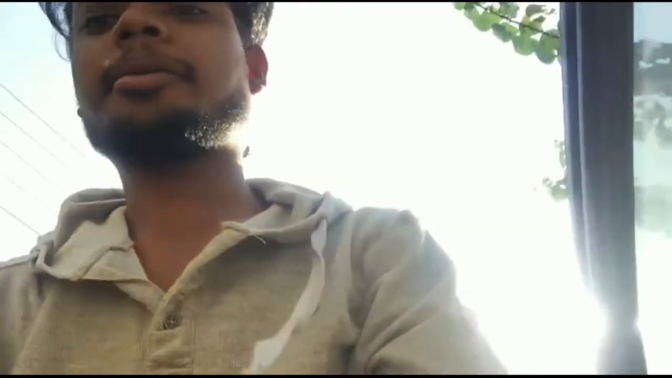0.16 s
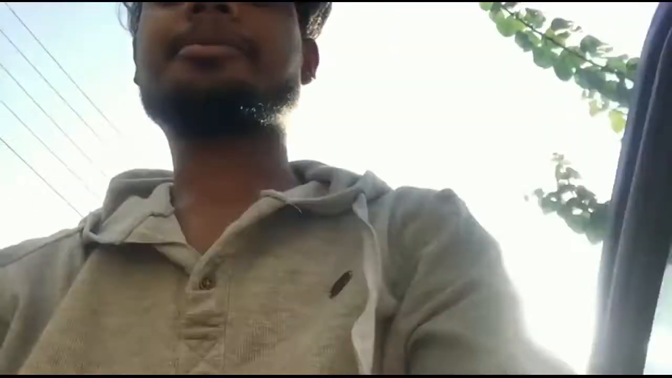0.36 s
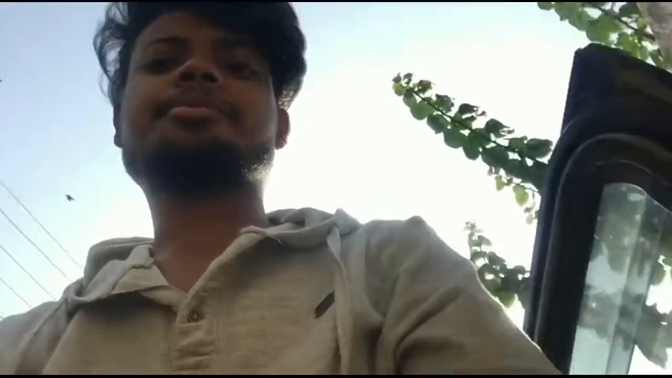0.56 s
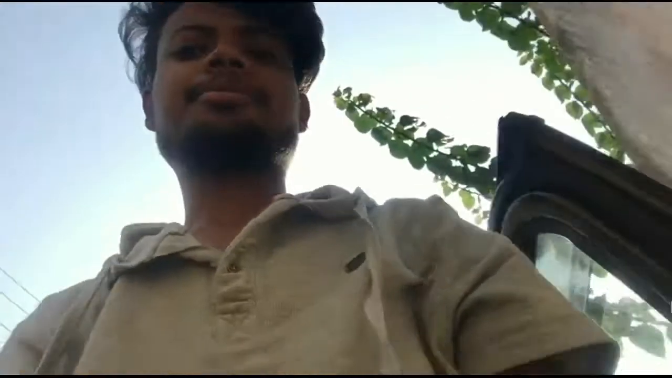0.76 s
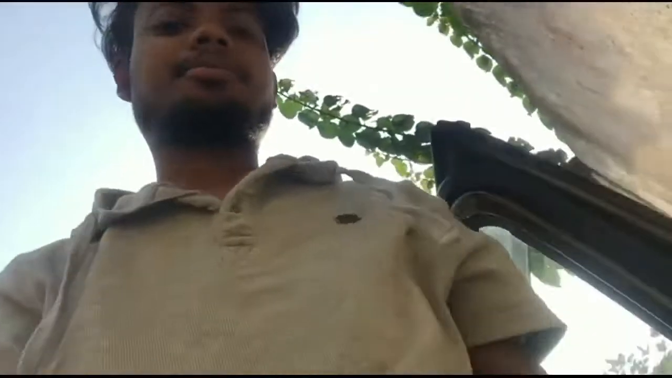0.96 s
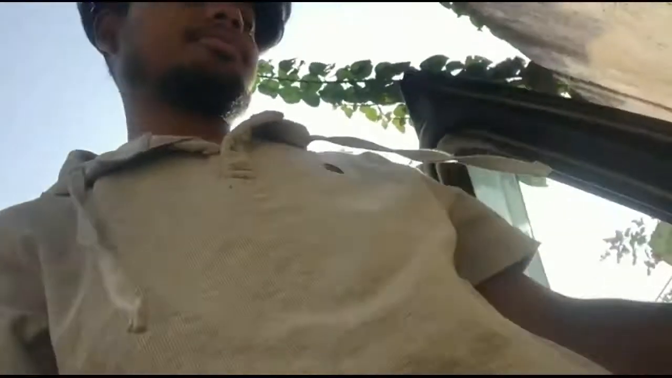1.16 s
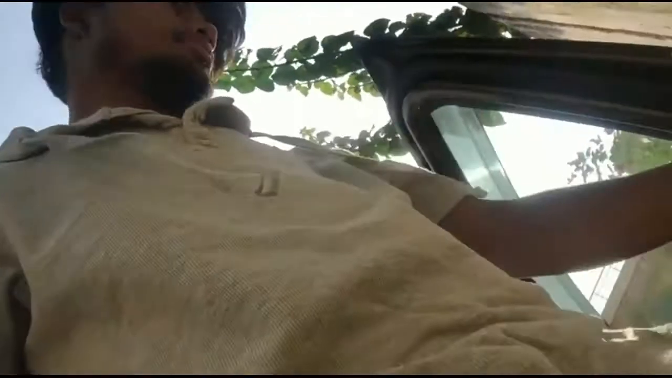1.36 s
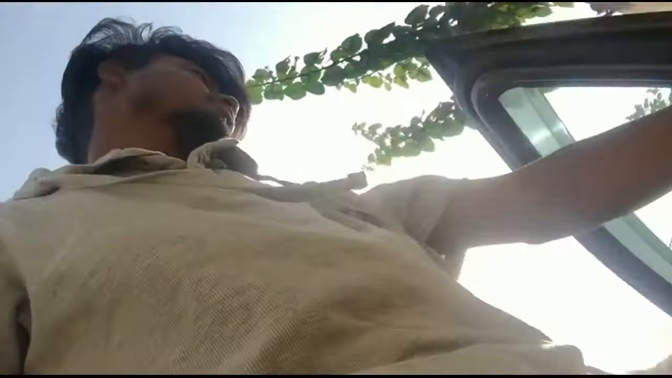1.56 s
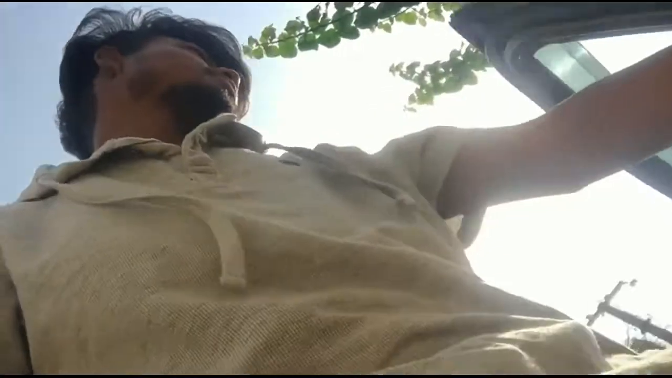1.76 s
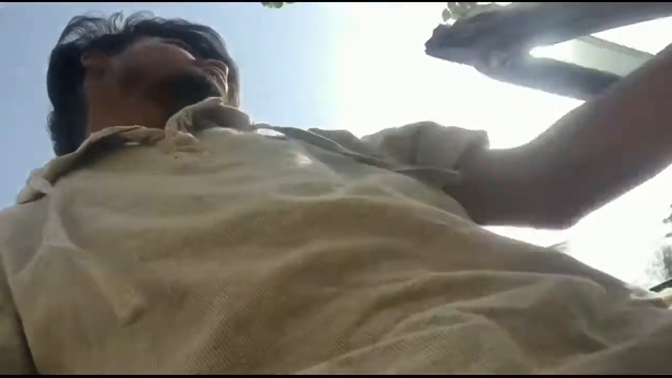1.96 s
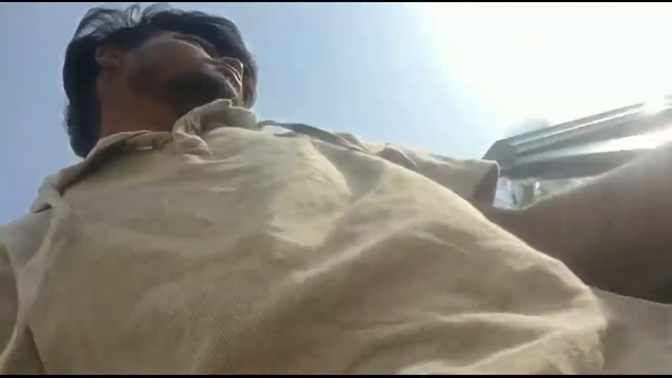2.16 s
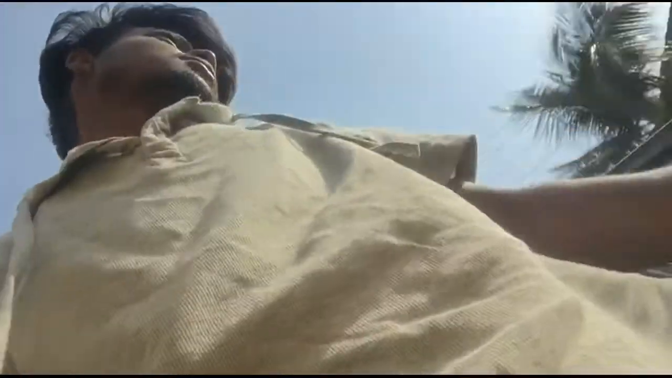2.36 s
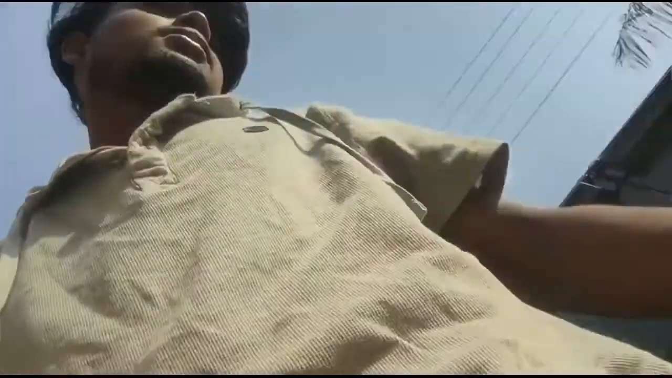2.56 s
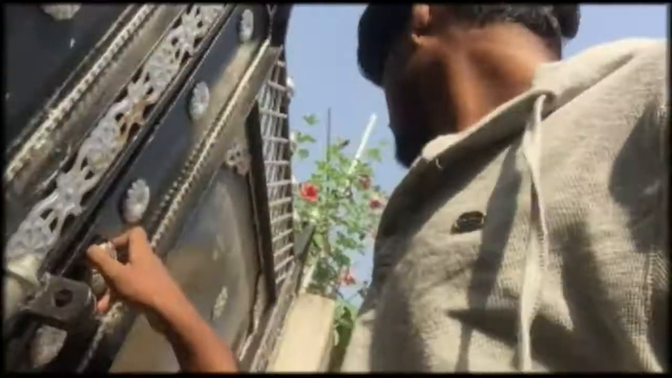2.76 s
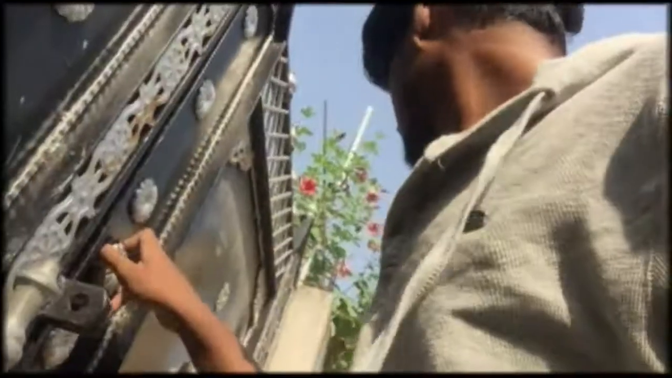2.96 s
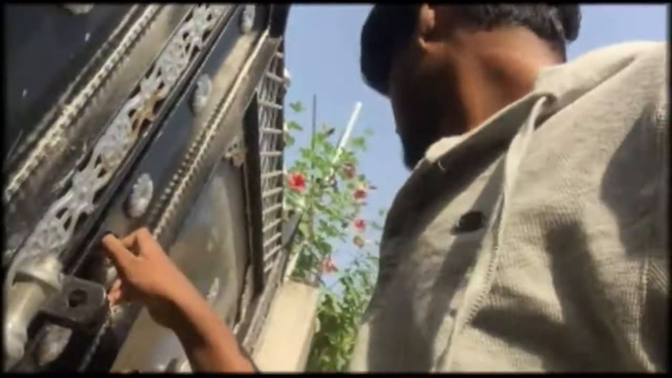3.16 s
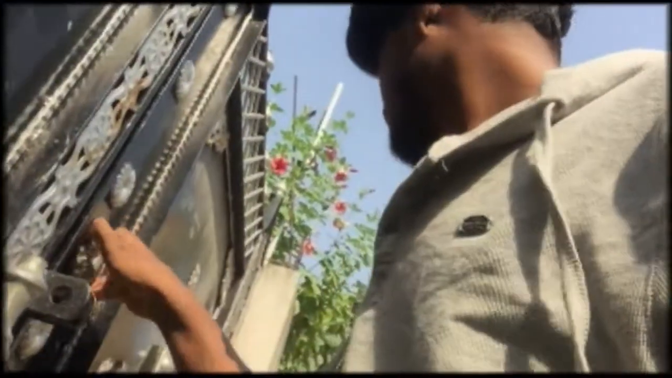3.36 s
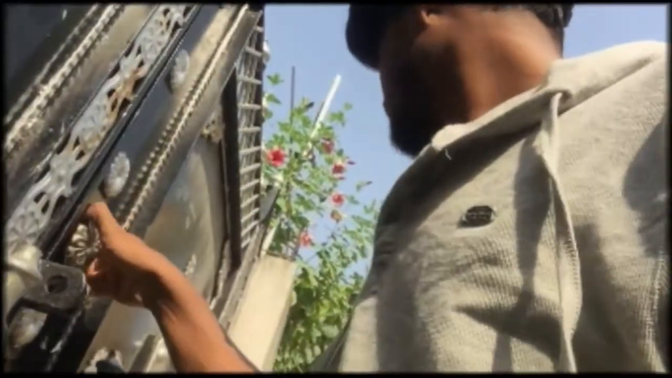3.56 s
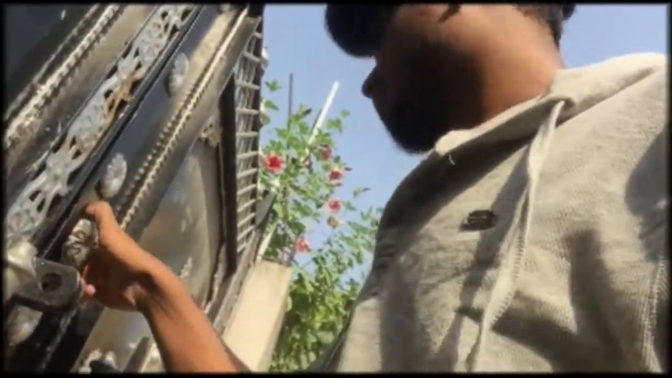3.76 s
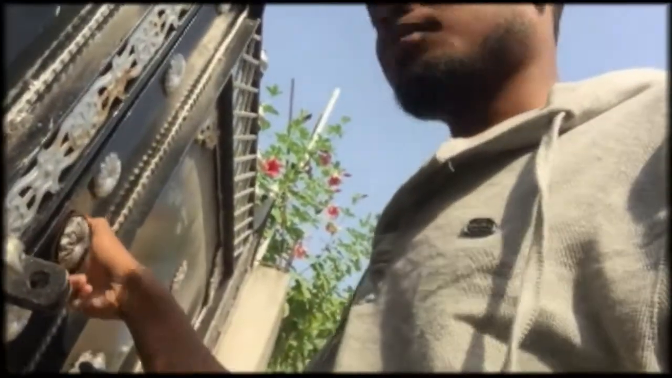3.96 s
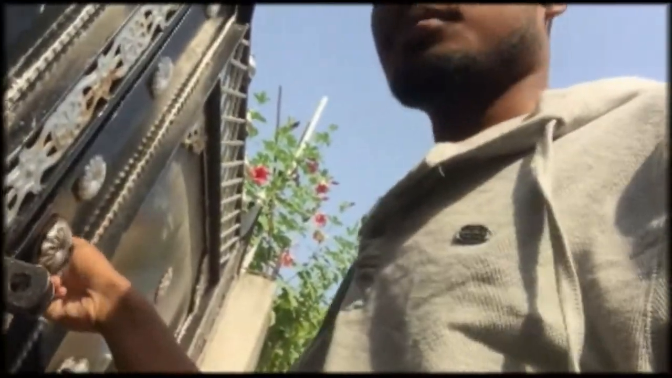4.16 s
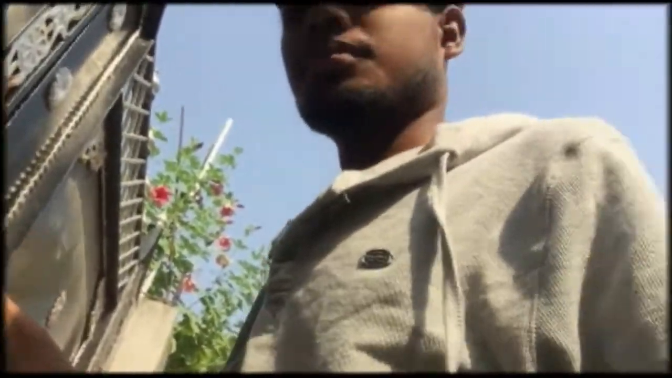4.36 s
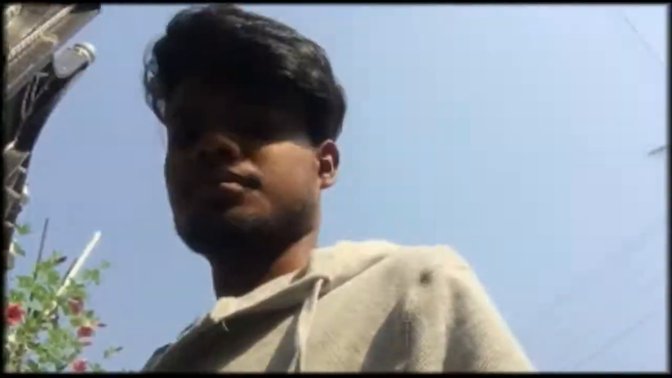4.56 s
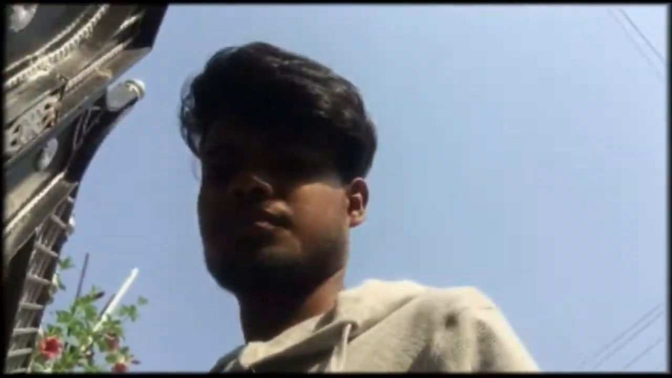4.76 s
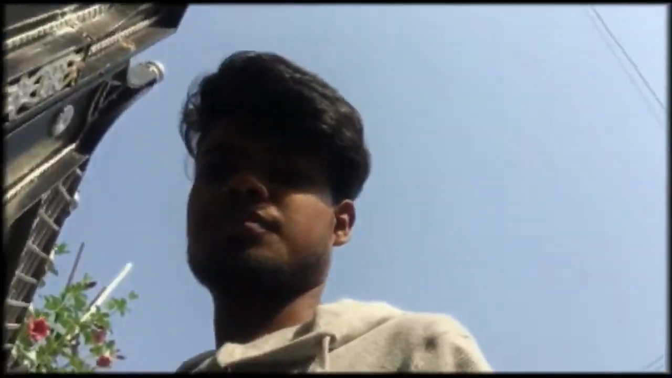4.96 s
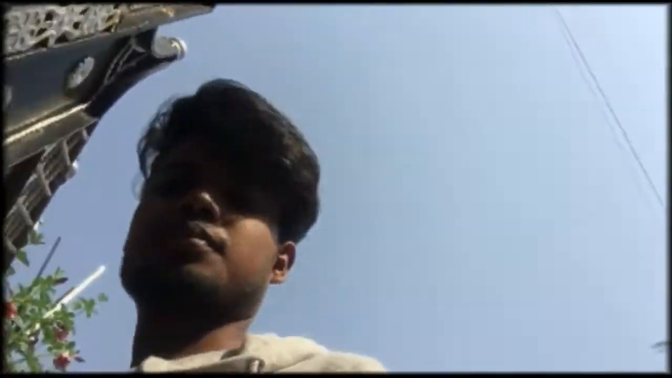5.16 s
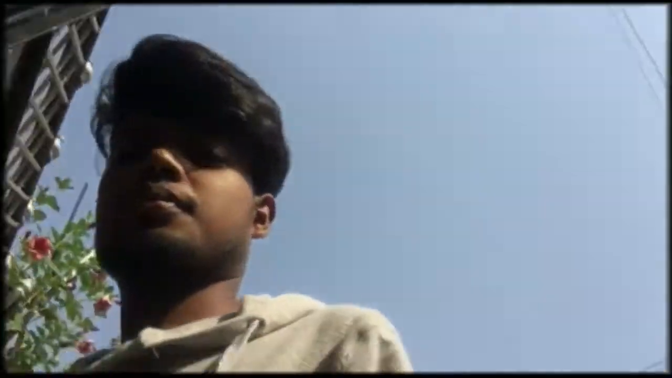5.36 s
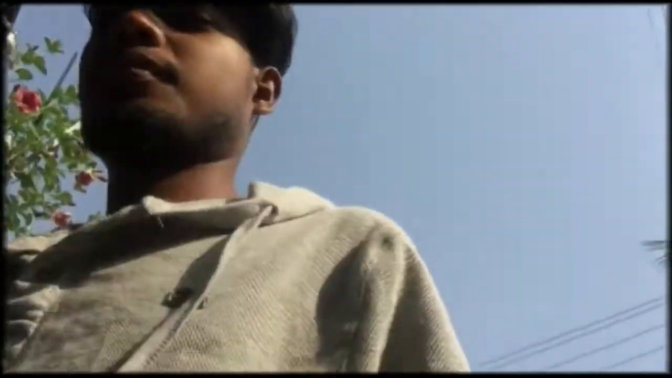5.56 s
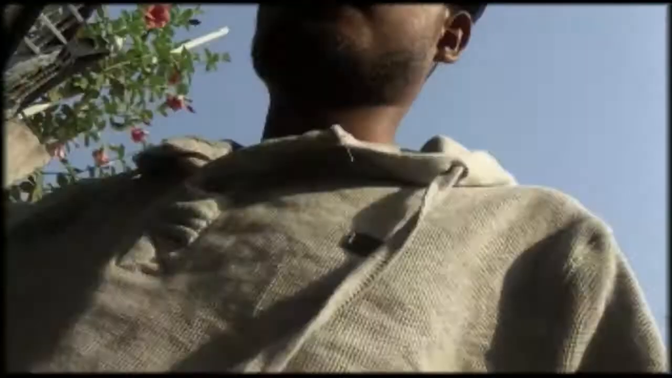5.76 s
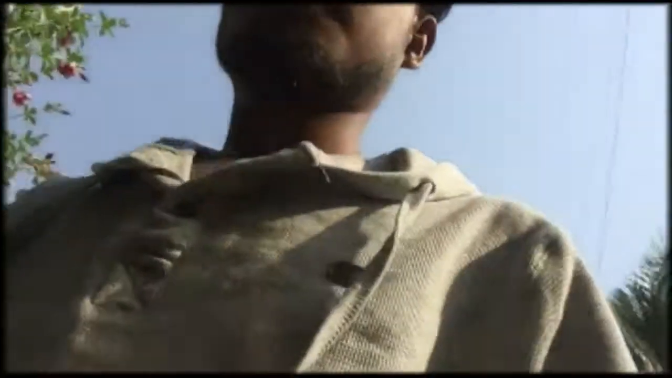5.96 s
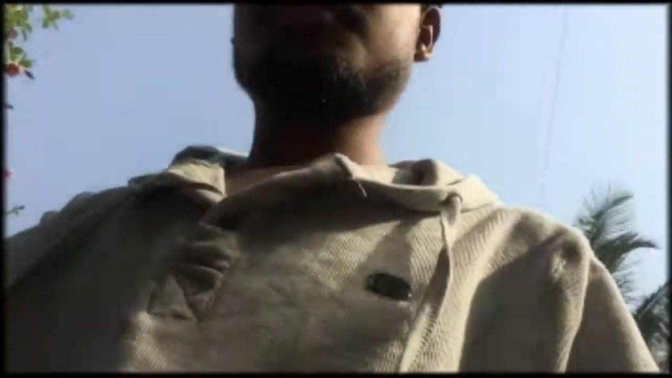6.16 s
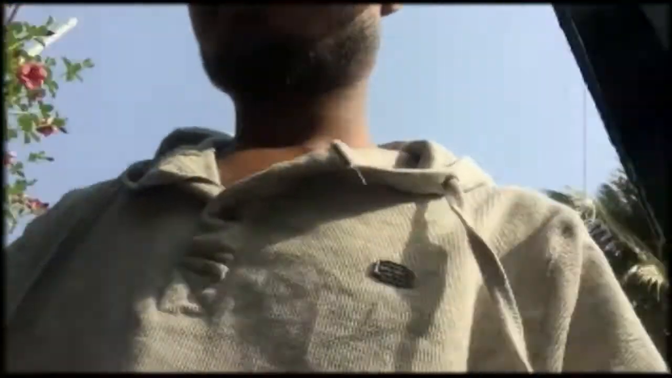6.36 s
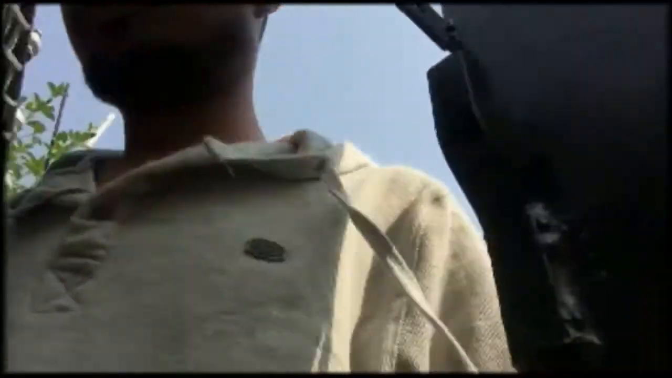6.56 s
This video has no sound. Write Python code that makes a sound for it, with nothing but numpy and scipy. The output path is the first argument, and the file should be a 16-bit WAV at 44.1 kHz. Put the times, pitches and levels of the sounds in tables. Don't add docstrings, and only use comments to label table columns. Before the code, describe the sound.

Bright songbird trills over scuffing soles in a walled yard, a steel gate slams hard, then a bolt grinds and a latch clanks over engine drone.

```python
import sys
import numpy as np
from scipy import signal
from scipy.io import wavfile
from scipy.ndimage import uniform_filter1d

SR = 44100
rng = np.random.default_rng(int(sys.argv[2]) if len(sys.argv) > 2 else 0)


def boost(x):
    u = np.asarray(x, float) / 20
    return 10 ** u


def file_out(sig):
    cols = np.atleast_2d(sig).T
    lim = np.clip(cols, -1, 1)
    pcm = np.round(lim * 32767).astype(np.int16)
    wavfile.write(sys.argv[1], SR, pcm)


N = 295470
TIME = np.arange(N) / SR
CUT_S = 2.617
EDGES = 20 * 2 ** np.arange(0, 9.8, 1 / 3)

# after_start_ms, pitch_hz, level_db
DIP = [(0, 5300, -24), (5, 4650, -11), (11, 4150, 2), (15, 3550, -9), (19, 3400, -19), (25, 4100, 3),
       (29, 4600, -9), (33, 5700, -22)]
SWEEP = [(0, 5900, -12), (5, 7300, -18), (9, 6900, -18), (12, 5950, -8), (16, 5050, -12), (20, 4400, 3),
         (24, 4200, 5), (27, 3500, -5), (33, 2600, -14)]
WARBLE = [(0, 4300, -4), (3.5, 5800, -8), (7, 5850, -5), (10, 4900, -14), (14, 4500, 3), (18, 4250, -2),
          (24, 3500, 0), (29, 3480, 2), (37, 4300, -3)]
CHIP = [(0, 6200, -18), (4, 5600, -14), (6, 4500, 0), (7.5, 4050, 7), (10, 3900, -8), (13, 4200, -4),
        (15, 4300, -20)]
LIFT = [(0, 2900, -8), (3, 2850, -3), (6, 3050, 1), (9, 3350, 1), (12, 3500, -12)]
DROP = [(0, 5000, -14), (2, 3600, -4), (4, 2950, 0), (9, 2900, -4), (13, 3000, 2), (19, 3050, -6),
        (22, 3100, -18)]
# mode_hz, level_db, t60_s
FRAME = [(174.2, -0.5, 0.26), (308, -0.5, 0.25), (400, -1.5, 0.18), (547, -6.5, .08), (647, 0, 0.074),
         (820, -5, 0.052), (944, -11.5, 0.052), (1462, -11.5, 0.17), (2080, -9, 0.024)]
# band_hz, level_db_per_hz
LOCK_TAIL = [(290, -16.5), (960, -21), (2980, -4.5), (5020, -17), (6800, -14.5), (14000, -32), (16000, -55)]
# band_hz, t60_s
GRIT_T60 = [(300, 0.13), (2000, 0.027), (12000, 0.014)]
BAR_T60 = [(200, 0.097), (1000, 0.22), (4000, 0.13), (12000, 0.074)]


def rms_one(x):
    return x / np.sqrt(np.mean(x ** 2) + 1e-20)


def in_time(rows):
    s, *columns = np.transpose(rows)
    return [np.interp(TIME, s, c) for c in columns]


def at_hz(points, hz):
    points = np.array(points)
    return np.interp(np.log(hz), np.log(points[:, 0]), points[:, 1])


def filtered(x, order, hz, kind):
    return signal.sosfilt(signal.butter(order, hz, kind, fs=SR, output="sos"), x)


def drift(rate):
    knots_per_s = 400
    knots = rng.standard_normal(7 * knots_per_s)
    r = np.exp(-2 * np.pi * min(rate, 150) / knots_per_s)
    smooth = rms_one(signal.lfilter([1], [1, -2 * r, r * r], knots))
    return np.interp(TIME * knots_per_s, np.arange(len(knots)), smooth)


def breath(hz):
    return rms_one(filtered(rng.standard_normal(N), 4, hz, "low"))


def ring(x, hz, t60):
    r, w = boost(-60 / (t60 * SR)), 2 * np.pi * hz / SR
    return signal.lfilter([0, np.sin(w)], [1, -2 * r * np.cos(w), r * r], x + 1e-18)


def dying(x, t60):
    return signal.lfilter([1], [1, -boost(-60 / (t60 * SR))], x + 1e-18)


def clicks(events, spread_db=0):
    out, rows = np.zeros(N), np.array(events)
    level_db = rows[:, 1] + spread_db * rng.standard_normal(len(rows))
    out[np.round(rows[:, 0] * SR).astype(int)] = boost(level_db)
    return out


def softened(x, samples):
    return signal.lfilter(np.hanning(samples) / (samples / 2), [1], x)


def coloured(spectrum, gain, source=None, span=slice(None)):
    white = rng.standard_normal((2, N)) if source is None else source
    centre = np.sqrt(EDGES[1:] * EDGES[:-1])
    level = boost(at_hz(spectrum, centre)) * (centre > spectrum[0][0]) * (centre < spectrum[-1][0])
    level = level / np.sqrt(np.sum(level ** 2 * np.diff(EDGES)) * 2 / SR)
    out = np.zeros(N)
    for k in np.flatnonzero(level):
        band = filtered(white[k % 2, span], 2, EDGES[k:k + 2], "band")
        out[span] += level[k] * gain(centre[k]) * band
    return out


def blows(events, modes, modes_db, tail, tail_t60, tail_db):
    span = slice(max(int(events[0][0] * SR) - SR // 4, 0), int(events[-1][0] * SR) + SR)
    hit = clicks(events)[span]
    rattle = coloured(tail, lambda hz: boost(tail_db) * dying(hit, at_hz(tail_t60, hz)), span=span)
    ringing = sum(boost(db) * ring(clicks(events, spread_db=5), hz, t60) for hz, db, t60 in modes)
    return rattle + boost(modes_db) * ringing


def effort(strokes, motion):
    s, hold, *levels = np.array(strokes).T[:, :, None]
    rise, fall, steeper = motion
    loss_db = rise * np.clip(s - TIME, 0, None) + fall * np.clip(TIME - s - hold, 0, None)
    body_db = np.max(levels[0] - loss_db, axis=0)
    grit_db = np.max(levels[1] - steeper * loss_db, axis=0)
    return uniform_filter1d(boost(np.clip([body_db, grit_db], -120, 0)), size=300, axis=1)


def rubbing(gains, body, treble, body_db, treble_db, grain_db):
    busy = np.flatnonzero(gains[0] > boost(-100))
    span = slice(busy[0], busy[-1])
    level, top = gains[:, span]
    grains = rng.standard_normal((2, N)) * boost(grain_db * drift(150))
    grains /= grains.std()
    low = coloured(body, lambda hz: level * boost(body_db + 2.5 * drift(23)[span]), grains, span)
    high = coloured(treble, lambda hz: top * boost(treble_db + 3.7 * drift(40)[span]), grains, span)
    return low + high


def whistle(out, s, hz, db, flutter, overtones_db, wobble):
    # pitch_hz, level_db
    beak = [(2500, 5), (3750, 1), (4250, 3.5), (4750, -1), (6000, 7), (9000, 10), (12000, 18.5), (15500, 5)]
    span = slice(int(s[0] * SR), min(int(s[-1] * SR), N))
    t = TIME[span]
    pitch, level_db = np.interp(t, s, hz) * (1 + wobble[span]), np.interp(t, s, db)
    phase = 2 * np.pi * np.cumsum(pitch) / SR
    edge = np.clip(np.minimum(t - s[0], s[-1] - t) / .002, 0, 1)
    richer_db = .5 * (level_db + 27) - 20 * np.log2(pitch / 3800)
    partials = 0
    for k, overtone_db in enumerate(overtones_db):
        partial_db = overtone_db + k * richer_db + at_hz(beak, (k + 1) * pitch)
        partials = partials + boost(partial_db) * np.sin((k + 1) * phase)
    voice = np.zeros(N)
    voice[span] = np.sqrt(2) * edge * flutter[span] * boost(level_db) * partials
    return out + voice


def bird():
    # syllable, start_s, repeats, gap_s, gap_growth, level_db
    trills = [
        (DIP, .019, 3, .0345, 1.03, -23),
        (DIP[:5], .123, 1, 0, 1.0, -21),
        (DROP, .293, 1, 0, 1.0, -28),
        (CHIP, .331, 3, .0145, 1.0, -26),
        (LIFT, .382, 3, .015, 1.0, -27),
        (SWEEP, .4895, 1, 0, 1.0, -28),
        (SWEEP, .5405, 3, .054, 1.04, -24),
        (SWEEP, .7145, 1, 0, 1.0, -27),
        (WARBLE, 1.049, 6, .037, 1.0, -27),
    ]
    # after_start_ms, pitch_hz, level_db
    falling_chip = [(0, 6200, -6), (2, 5500, 0), (5, 4300, -2), (7, 3800, -10)]
    grace_s = (.866, .8725, .879)
    # start_s, length_s, first_hz, last_hz, level_db
    held = [(0.317, 0.0086, 6730, 6300, -37.5), (0.371, 0.012, 6400, 6540, -39),
            (0.275, .04, 8300, 9000, -58), (0.883, 0.022, 4370, 4235, -25),
            (0.905, 0.005, 4400, 6300, -34.5), (0.915, 0.022, 5940, 6150, -41),
            (0.909, .016, 2930, 3180, -33), (0.922, 0.118, 3170, 3400, -32),
            (1.369, 0.089, 2745, 2940, -47), (1.465, .03, 3836, 3875, -35.5),
            (1.503, 0.072, 4600, 4640, -44), (1.492, 0.063, 2800, 2800, -45),
            (1.673, 0.025, 4200, 4290, -30.5), (1.715, 0.1, 3640, 3560, -36.5), (1.70, .1, 4270, 4230, -47),
            (.85, .03, 2540, 2600, -50), (2.255, .04, 12900, 12900, -66), (1.717, 0.054, 3140, 3160, -46),
            (1.716, 0.062, 7500, 7100, -54), (2.165, 0.038, 3870, 3840, -39.5),
            (2.25, 0.033, 4320, 4230, -35), (2.287, 0.025, 3800, 3700, -34.5),
            (2.316, 0.039, 3550, 3520, -32.5), (2.365, 0.029, 3595, 3580, -33.5),
            (2.59, 0.026, 5680, 5870, -50)]
    # start_s, length_s, first_hz, last_hz, level_db
    rattles = [(0.266, 0.07, 5480, 5600, -44), (.33, 0.073, 5680, 6600, -41.5),
               (1.38, .04, 3300, 3270, -41.5), (1.435, 0.065, 3600, 4200, -37.5),
               (1.41, 0.14, 5620, 5560, -45), (1.43, 0.085, 6400, 6400, -56),
               (1.498, 0.069, 3200, 3270, -37), (1.28, .09, 3900, 3860, -45),
               (1.6, 0.072, 3300, 3650, -39.5), (1.635, 0.09, 5600, 5700, -43),
               (1.65, .12, 6800, 5900, -53.5), (2.2, 0.065, 2530, 3900, -41.5),
               (2.22, 0.077, 6200, 6600, -47.5), (2.225, .035, 4300, 5070, -38.5),
               (.91, 0.07, 6000, 6050, -45), (.33, .05, 11500, 11500, -62), (1.6, 0.057, 10000, 13000, -69),
               (.02, .14, 5600, 6000, -54), (1.735, .06, 3620, 3600, -40), (1.74, .035, 6200, 6250, -48),
               (.03, .13, 7200, 7200, -56), (.33, .09, 7400, 7000, -56), (1.55, .09, 5600, 5700, -54),
               (.93, .05, 9300, 9300, -60), (1.07, .2, 4600, 4500, -44)]
    # time_s, pitch_hz, level_db
    falling = [
        (1.861, 6030, -42),
        (1.904, 5950, -32.5),
        (1.937, 5480, -30.5),
        (1.970, 4950, -33),
        (1.999, 4406, -25),
        (2.031, 4100, -24),
        (2.09, 3880, -25),
        (2.128, 3850, -30),
        (2.15, 3850, -42),
    ]
    catches_s = (2.046, 2.070)
    overtones_db = [-1.5, -30, -46]

    out, even, shake = np.zeros(N), boost(1.2 * drift(130)), drift(160)
    sung = [(falling_chip, s, 1, -33) for s in grace_s]
    for shape, first, count, gap, slowing, db in trills:
        for k in range(count):
            start = first + gap * np.sum(slowing ** np.arange(k))
            sag = 1 - .008 * (k - (count - 1) / 2)
            ends_db = -2.5 * (2 * k / max(count - 1, 1) - 1) ** 2
            sung.append((shape, start, sag, db + ends_db))
    for shape, start, stretch, level_db in sung:
        ms, hz, db = np.transpose(shape)
        s = start + ms / 1000
        wobble = 0.008 * shake * (np.interp(TIME, s, hz) / 4000) ** 2
        out = whistle(out, s, stretch * hz, db + level_db, even, overtones_db, wobble)

    pulsing = np.sin(2 * np.pi * np.cumsum(70 * boost(1.4 * drift(20.0))) / SR) + 2.0 * drift(120)
    for start, length, first_hz, last_hz, level_db in held:
        buzz = np.clip((level_db + 32) / (-38 + 32), 0, 1)
        flutter = even * (1 + (0.11 + 0.13 * buzz) * pulsing)
        out = whistle(out, np.array([start, start + length]), [first_hz, last_hz],
                      np.full(2, level_db), flutter, overtones_db, (.005 + .012 * buzz ** 2) * shake)

    flicks_per_s, flick_span, rattle_shake = 70, .04, .03
    cycle = np.cumsum(flicks_per_s * boost(1.5 * drift(25.5))) / SR
    for row, (start, length, first_hz, last_hz, level_db) in enumerate(rattles):
        flick = (cycle + .37 * row) % 1
        flutter = (0.5 + breath(300)) * np.sin(np.pi * flick) ** 2
        wobble = flick_span * (2 * flick - 1) + rattle_shake * shake
        out = whistle(out, np.array([start, start + length]), [first_hz, last_hz],
                      np.full(2, level_db + 1.5), flutter, overtones_db, wobble)

    out = out * (1 + boost(-12) * breath(350))
    s, hz, db = np.transpose(falling)
    broken = 1 - sum(np.exp(-((TIME - c) / 0.01) ** 2) for c in catches_s)
    flutter = broken * boost(2.5 * drift(110) - 2) * (1 + .35 * breath(300))
    return whistle(out, s, hz, db, flutter, overtones_db, 0.009 * shake)


def gate_slam():
    # start_s, peak_db
    touch = [
        (2.3865, -8),
        (2.390, -16),
        (2.395, -5.5),
    ]
    # start_s, peak_db
    impacts = [
        (2.4005, -12.5),
        (2.4035, 5),
        (2.4065, -4),
        (2.410, -3.5),
        (2.421, -5),
        (2.470, -11),
    ]
    # start_s, peak_db
    boom = [
        (2.4055, 11.5),
        (2.4195, 5.5),
        (2.434, -4),
        (2.4455, 4),
    ]
    # mode_hz, level_db, t60_s
    bars = [(400, 6, 0.037), (511, 4.5, 0.08), (770, -3, 0.044), (940, -14, 0.048), (1210, -10, 0.06),
            (1490, -16, 0.059), (2054, -2, 0.029), (2520, -3, 0.078)]
    leaf = [(52.4, -6, 0.45), (69.7, -3, 0.32), (90, -12, 0.49), (139.6, -16.5, 0.26), (196.8, -12, 0.21)]
    # band_hz, t60_s
    rattle = [(59, -10), (100, -7.5), (239, -15.5), (930, -11), (1080, -13), (16000, -48.5)]
    rattle_t60 = [(100, 0.61), (500, 0.086), (2000, 0.11), (10000, 0.11)]
    out = blows(impacts, bars, -15.5, rattle, rattle_t60, -14.0)
    push = softened(clicks(boom), 90)
    out += sum(boost(db - 11.5) * ring(push, hz, t60) for hz, db, t60 in leaf)
    contact = softened(clicks(touch), 40)
    return out + sum(ring(contact, hz, t60) for hz, _, t60 in bars[:2])


def feet():
    # start_s, hold_s, level_db, grit_db
    scuffs = [(.08, 0.072, -35.5, -70), (.2, 0.47, -47, -78), (.65, 0.0074, -36.5, -56),
              (.69, 0.0048, -33.5, -70), (.72, 0.087, -42.5, -85), (1.41, 0.01, -40, -66.5),
              (1.5, 0.0078, -37, -85), (1.61, 0.0019, -39.5, -70), (1.83, .003, -33.5, -70),
              (1.94, 0.0031, -37, -83.5), (2.0, 0.04, -45, -84.5), (2.374, 0.032, -29, -69)]
    # rise_db_per_s, fall_db_per_s, grit_steepness
    motion = (780, 190, 0.6)
    # band_hz, level_db_per_hz
    sole = [(200, -8), (430, -9), (600, -8), (1000, -5), (2400, -11.5)]
    # start_s, peak_db
    grains = [(0.4, -17.5), (0.616, -17), (0.646, -18), (0.685, -16.5), (0.717, -10.5), (0.734, -10.5),
              (1.412, -19.5), (1.496, -29.5), (1.588, -24.5), (1.818, -23), (1.827, -24.5), (1.933, -23),
              (1.983, -36), (2.005, -33.5)]
    scrape = [(2400, 0.0), (5000, -2.5), (10000, -12.0), (16500, -19.5)]
    crunch = [(300, 8.5), (1000, -5.5), (3000, -13.0), (16500, -34.0)]
    out = rubbing(effort(scuffs, motion), sole, scrape, 0.27, 18.7, 3.9)
    return out + blows(grains, [(623, 0.0026, 0.064)], -12.0, crunch, GRIT_T60, -14.5)


def key():
    # start_s, peak_db
    clinks = [
        (2.8795, -24.5),
        (2.883, -22),
        (2.8935, -28.5),
        (2.897, -24),
        (2.903, -38),
    ]
    # start_s, peak_db
    turn = [
        (3.430, -27),
        (3.439, -27.5),
        (3.459, -21),
    ]
    # start_s, hold_s, level_db, grit_db
    twists = [
        (3.12, 0.066, -48, -67.5),
        (3.385, 0.053, -41.5, -57.5),
        (3.45, 0.0016, -27, -34.5),
        (3.6, 0.12, -53, -85),
    ]
    # rise_db_per_s, fall_db_per_s, grit_steepness
    motion = (600, 270, 1.8)
    # band_hz, level_db_per_hz
    cylinder = [(300, 1), (600, -28), (960, 11.5), (1400, -4), (3000, -7.5), (4200, -37), (5000, -32)]
    # mode_hz, level_db, t60_s
    modes = [(1098, -10, 0.1), (1922, -12, .1), (2153, -13, 0.14), (2616, -8, 0.06), (2955, -14, .07),
             (3908, -18, .08), (5421, -18, .05), (6751, -1, 0.045), (6950, -8, 0.06)]
    # band_hz, t60_s
    rattle_t60 = [(500, 0.97), (3000, 0.063), (12000, 0.024)]
    scrape = [(5000, -9.0), (6800, 2.0), (8000, 13.0), (9500, -11.0), (16500, -15)]
    out = rubbing(effort(twists, motion), cylinder, scrape, 0.57, .6, 3.6)
    out += blows(clinks, modes, -3.0, LOCK_TAIL, rattle_t60, -12.0)
    return out + blows(turn, [], 0, LOCK_TAIL, rattle_t60, -4.0)


def frame_groan(level, level_db):
    drag = filtered(level * rng.standard_normal(N) * boost(1.6 * drift(60)), 2, 150, "high")
    groan = sum(boost(db) * ring(drag, hz, t60) / np.sqrt(t60 * SR / 27) for hz, db, t60 in FRAME)
    return boost(level_db) * groan


def bolt():
    # start_s, hold_s, level_db, grit_db
    shoves = [
        (3.79, 0.0042, -41, -86),
        (3.86, 0.055, -26.5, -53.5),
        (3.99, 0.06, -28, -58),
        (4.05, 0.0026, -26.5, -59),
        (4.3, 0.089, -40, -72.5),
        (4.43, 0.0039, -27, -52.5),
        (4.5, 0.15, -34, -62),
        (4.7, 0.096, -42.5, -95),
    ]
    # rise_db_per_s, fall_db_per_s, grit_steepness
    motion = (420, 95, 2.2)
    # band_hz, level_db_per_hz
    body = [(150, -25.5), (312, 7), (403, -7), (812, -1.5), (1120, -12), (2170, -20), (5000, -46.5)]
    # start_s, peak_db
    jolts = [
        (3.787, -25),
        (3.80, -30),
    ]
    # start_s, peak_db
    snags = [
        (3.833, -38),
        (3.853, -21.5),
        (3.871, -6),
        (3.912, -20),
        (4.021, -16.5),
        (4.172, -41.5),
        (4.201, -36.5),
    ]
    grit = [(4500, 11), (7500, 0.5), (10000, -4.0), (16500, -10.0)]
    slide = effort(shoves, motion)
    out = frame_groan(slide[0], level_db=-8.0) + rubbing(slide, body, grit, 0.22, .6, 0.72)
    out += blows(snags, FRAME[3:], -15.5, body, BAR_T60, -18.5)
    return out + ring(clicks(jolts), 316, 0.6)


def latch():
    # start_s, peak_db
    bounces = [
        (4.381, -0.5),
        (4.4676, -11.5),
        (4.5159, -13),
        (4.55, -18.5),
        (4.5745, -14.5),
    ]
    # mode_hz, level_db, t60_s
    modes = [(305, -13, .6), (400, -7, .08), (441, -4, .45), (466, -12, 1.8), (651, -20, .5),
             (802, -4, .15), (904, -10, .11), (1010, -17, .4), (1750, -12, .15), (1965, -19, .16),
             (2300, -10, .07), (4016, -3, .09), (4270, 1, .04), (4716, -9, .07)]
    # band_hz, level_db_per_hz
    rattle = [(120, -42.5), (200, -5), (806, -11), (1140, -20), (1770, -13.5), (3190, -15.5), (16000, -25)]
    return blows(bounces, modes, -15.5, rattle, BAR_T60, -10.5)


def grain_tick():
    # start_s, peak_db
    crack = [
        (5.997, -41),
    ]
    return blows(crack, [], 0, LOCK_TAIL, GRIT_T60, -12)


def hinge():
    # time_s, pitch_hz, first_db, second_db
    high_slip = [
        (6.455, 2740, -50, -70),
        (6.476, 2700, -55, -54),
        (6.51, 2710, -40, -67),
        (6.525, 2620, -54, -71),
        (6.56, 2640, -58, -72),
    ]
    # time_s, pitch_hz
    low_slip = [(6.489, 1157), (6.545, 1137), (6.631, 1130), (6.651, 1115), (6.7, 1079)]
    # bite_db, grip_db, end_db
    partials = [(-54, -50, -37), (-48, -50, -52), (-51, -50, -49), (-59, -46, -43), (-57, -54, -59)]
    upper_db = [-38, -30, -31, -32, -38, -43]
    onset_db = [-14, -12, -4, -30, -2]
    stack = list(partials) + [np.add(partials[3], db) for db in upper_db]
    paths = [[bite + soft, bite, bite, grip, end]
             for (bite, grip, end), soft in zip(stack, np.resize(onset_db, 11))]
    out = np.zeros(N)
    for s, hz, *levels in (np.transpose(high_slip), [*np.transpose(low_slip), *paths]):
        for k, db in enumerate(levels):
            flicker = boost(3.3 * drift(55) - 1.5)
            out = whistle(out, s, (k + 1) * hz, db, flicker, [0], 0.0028 * drift(70))
    scrape = uniform_filter1d(np.abs(out), size=1500) * rng.standard_normal(N)
    return out + boost(-22) * filtered(scrape, 1, [1500, 7000], "band")


def taps():
    # start_s, crack_db, thud_db, thud_hz
    touches = [
        (.0085, -33, -3, 400),
        (0.022, -40, -11, 133),
        (5.2165, -27, -27, 1100),
        (5.2195, -30.5, -17.5, 700),
        (5.297, -33, -37, 307),
        (5.3023, -28.5, -12.5, 193),
        (5.315, -36, -46, 287),
    ]
    crack = rng.standard_normal(N) * dying(clicks(touches), .012)
    casing = sum(ring(crack, hz, .008) for hz in (1250, 2250))
    thud = sum(ring(clicks([(s + 0.0017, db)]), hz, 5.1 / hz) for s, _, db, hz in touches)
    return 1.36 * crack + 0.2 * casing - thud


def walls(x, t60, level_db):
    t = TIME[:int(t60 * SR)]
    first_echo_s = .011
    decay = boost(-60 * t / t60) + 5.0 * boost(-60 * t / 0.11)
    response = rng.standard_normal(len(t)) * decay * np.clip(t / first_echo_s - .3, 0, 1)
    response = signal.lfilter([1], [1, -.15], response)
    return x + boost(level_db) * signal.fftconvolve(x, response / np.linalg.norm(response))[:N]


def engine(level_db):
    # multiple, level_db
    orders = [(3, -42), (4, -22.5), (5, -12.5), (6, -9), (7, -7), (8, -2), (9, -9), (10, -22), (11, -26),
              (12, -20.5), (16, -19), (17, -20), (21, -30)]
    phase = 2 * np.pi * np.cumsum(24.8 * (1 + 0.00619 * drift(1.24))) / SR
    tones = sum(boost(db + 3.4 * drift(2.12)) * np.sin(k * phase + 7.6 * rng.random()) for k, db in orders)
    return boost(level_db) * rms_one(tones)


def valve():
    ticks = [(s, -44.5 + 40) for s in np.arange(.001, CUT_S, 1 / 24.8)]
    push = filtered(clicks(ticks, spread_db=2), 2, [1950, 2250], "band")
    return boost(-6) * ring(push, 2090, .045) * boost(-34)


def background():
    # time_s, drone_db, air_db
    yard_levels = [
        (0.0, -26.5, -33),
        (0.2, -29, -50.5),
        (1.92, -27.5, -45.5),
        (3.38, -32.5, -55.5),
        (4.11, -28, -57),
        (5.95, -33.5, -50.5),
    ]
    # band_hz, level_db_per_hz
    air_spectrum = [(59, -31), (100, -12.5), (215, -0.5), (308, -13), (452, -20), (1100, -39), (2170, -37),
                    (16000, -77.5)]
    gust = [(20, -27.5), (38, -18.5), (70, 1), (150, -6), (210, -23.5)]
    drone_db, air_db = in_time(yard_levels)

    def air_gain(hz):
        treble = np.clip(np.log2(hz / 300) / 2, 0, 1)
        return boost(drone_db - 8.0 + treble * (air_db - drone_db + 25.0) + 2.76 * drift(8.9))

    wind_db = np.where(TIME < CUT_S, -43, -62.5)
    wind = coloured(gust, lambda hz: boost(wind_db + 4.0 + 1.0 * drift(4)))
    return coloured(air_spectrum, air_gain) + wind + engine(drone_db - 6.5) + valve()


def scene():
    # start_s, end_s, level_db
    bass_dip = (5.320, 5.384, -9)
    before = walls(bird(), 0.71, -7.5) + walls(gate_slam() + feet(), 0.99, -26.5)
    before *= np.clip((CUT_S - TIME) / 0.0041, 0, 1)
    lock = filtered(key() + bolt() + latch() + grain_tick(), 2, 130, "high")
    after = walls(lock + hinge(), 0.24, -10.5)
    yard = background()
    start, end, loss_db = bass_dip
    bass_gain = boost(loss_db * uniform_filter1d(1.0 * (TIME > start) * (TIME < end), size=400))
    bass = signal.sosfiltfilt(signal.butter(2, 700, fs=SR, output="sos"), yard)
    return (before + after + taps() + yard + (bass_gain - 1) * bass)[None]


def low_pass(x):
    return signal.sosfilt(signal.butter(12, 16510, fs=SR, output="sos"), x)


def record(dry):
    dry = dry + boost(-80) * rng.standard_normal(dry.shape)
    clipped = dry / (1 + np.abs(dry) ** 6) ** (1 / 6)
    mix = signal.sosfilt(signal.cheby2(10, 60, 17100, fs=SR, output="sos"), clipped)
    return low_pass(mix)


dry = scene()
out = record(dry)
file_out(out)
```